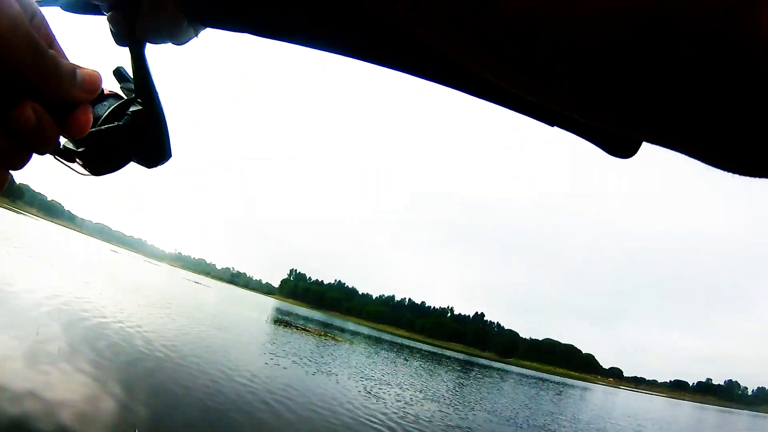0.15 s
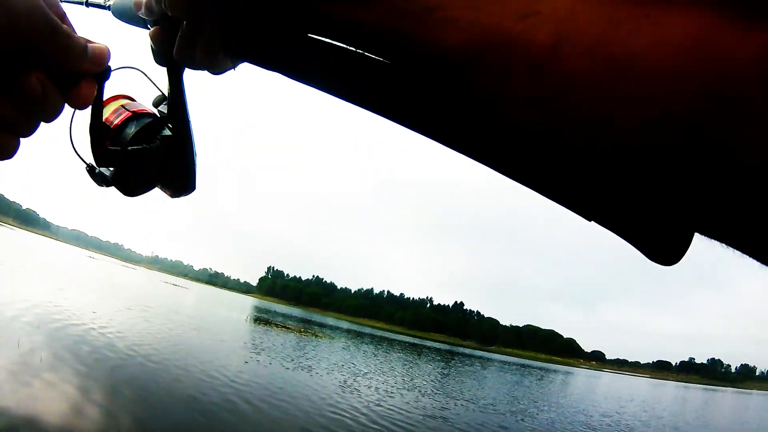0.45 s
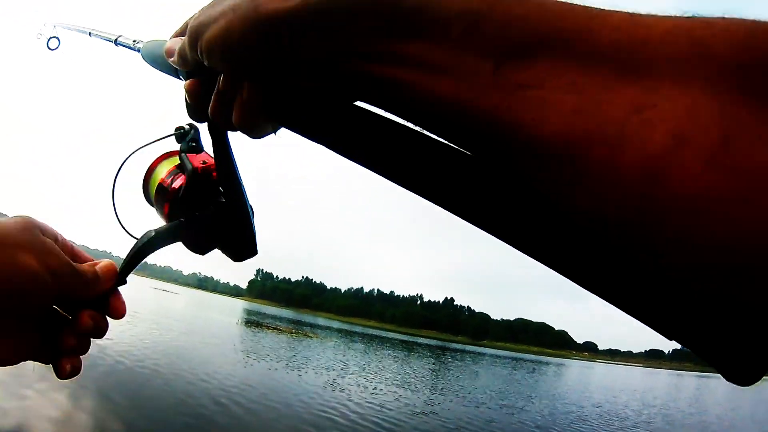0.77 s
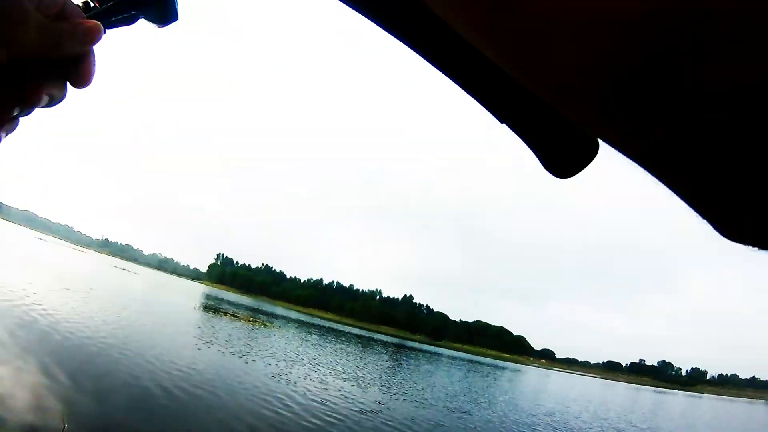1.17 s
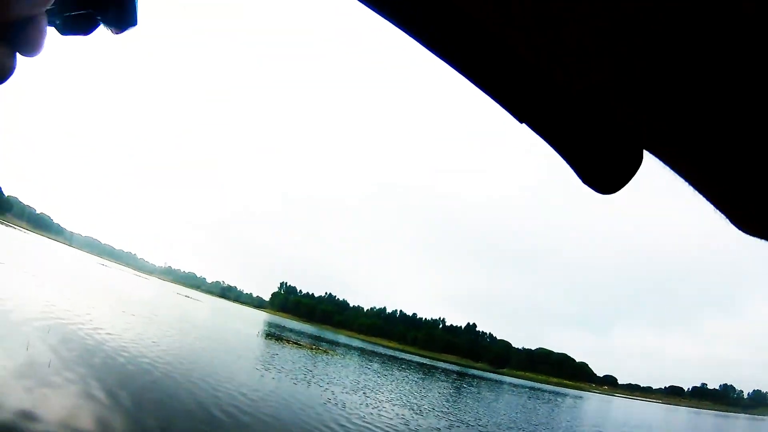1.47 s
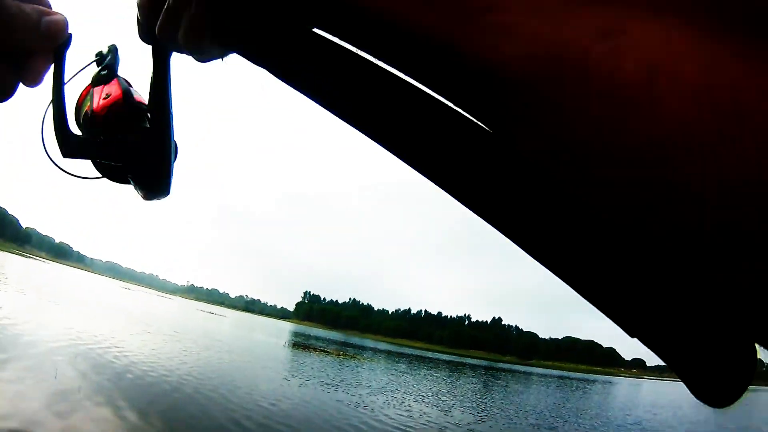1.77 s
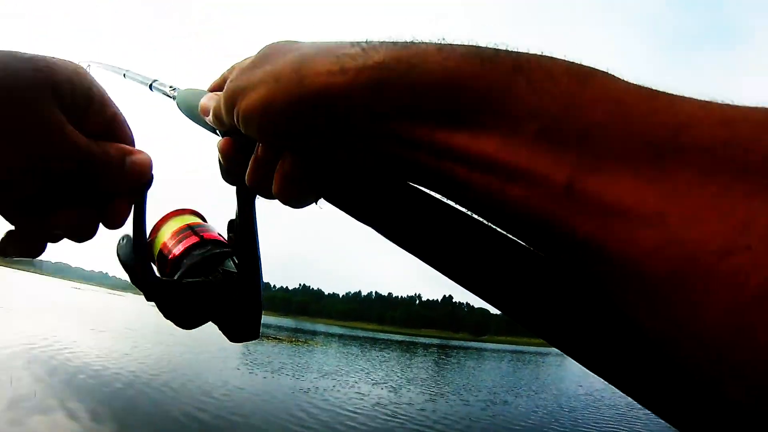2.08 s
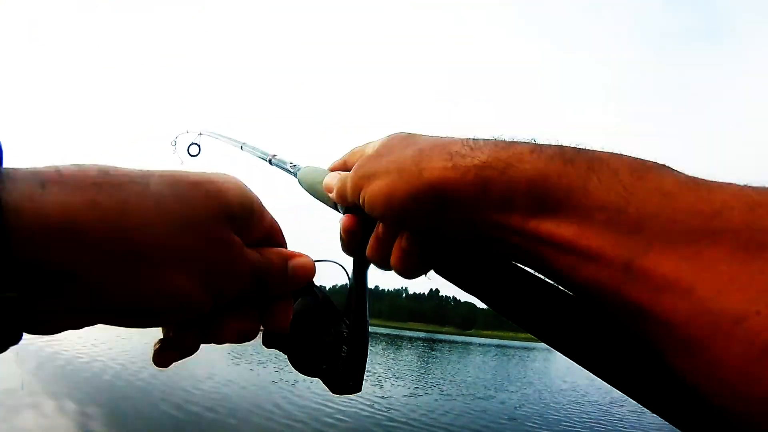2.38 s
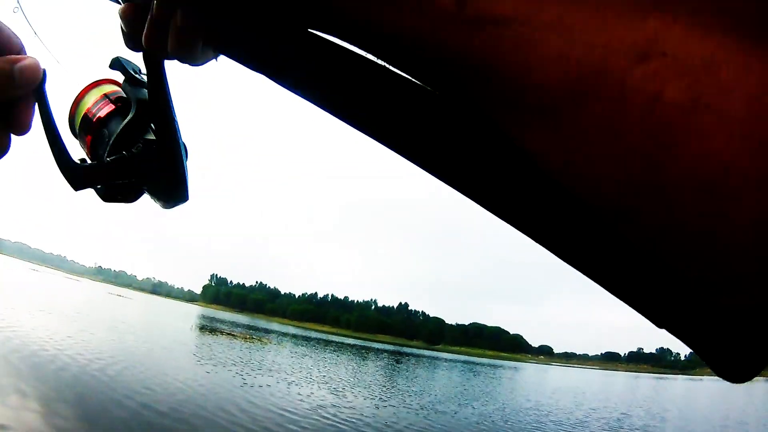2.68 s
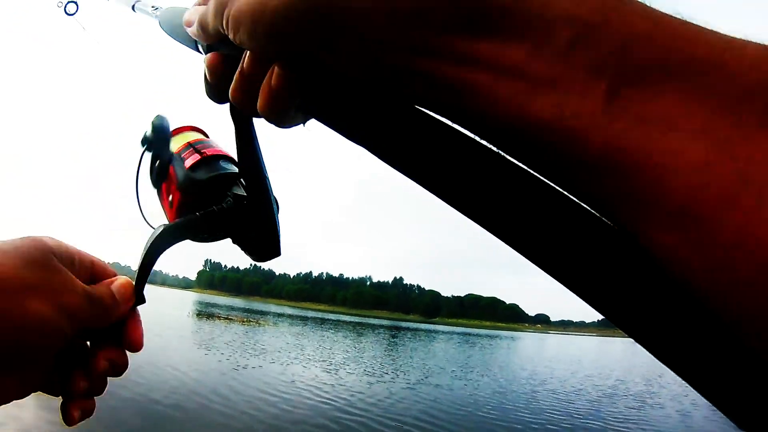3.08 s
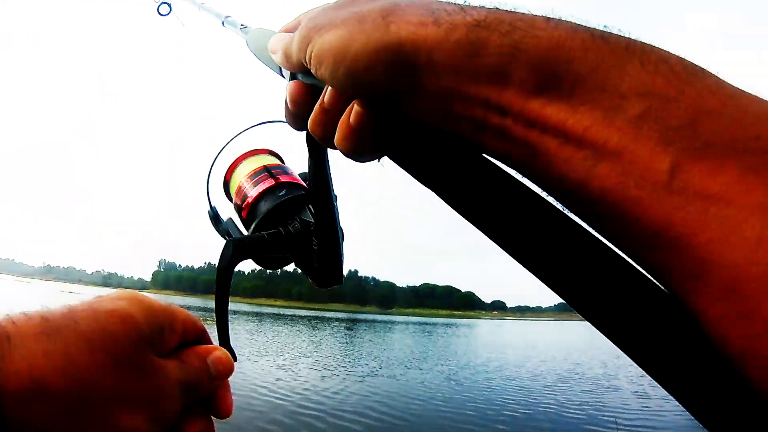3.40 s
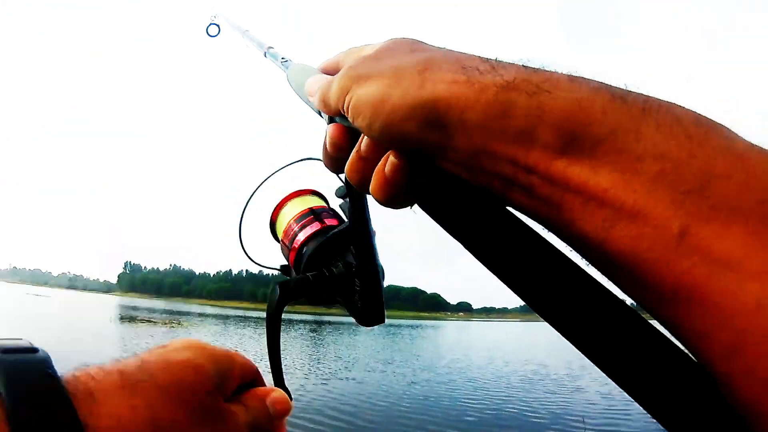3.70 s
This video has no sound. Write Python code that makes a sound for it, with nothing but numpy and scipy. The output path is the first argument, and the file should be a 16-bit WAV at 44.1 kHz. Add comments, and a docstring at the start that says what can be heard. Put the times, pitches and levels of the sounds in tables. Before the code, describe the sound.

A fishing reel is cranked outdoors, heard close and muffled through a camera case. From 0 to 0.9 s, soft rustling rubs and tiny ringing taps; at 1.13 and 1.19 s, sharper clacks with scraping. Quieter rubs and a rising line squeak follow around 1.6-1.8 s, then faint chirps. Rubbing returns at 2.5-3.1 s with brief squeaks. At 3.58 s one loud knock, quickly damped, over hiss and freshening wind rumble.

```python
"""A spinning reel is cranked on a lake, heard through the closed case of a camera worn on the body.
From the start reel and case give short ringing taps, strap and cloth rub and tick on the case, which
rings dully as dying sines, and light wind rumbles over microphone hiss, both made of shaped noise. Then
the line squeaks as it tightens and slackens: wobbling sines that glide or, once, hold as a rasp, and
short chirps. Near the end the wind freshens, and one hard knock rings out and is soon damped."""
import sys
import numpy as np
from scipy import signal
from scipy.fft import rfft
from scipy.io import wavfile
from scipy.ndimage import uniform_filter1d

SR = 44100
rng = np.random.default_rng(int(sys.argv[2]) if len(sys.argv) > 2 else 0)


def volts(x):
    """Linear amplitude factor 10**(x/20) for a level x in dB, scalar or array-like."""
    e = np.asarray(x, float) / 20
    return 10 ** e


def pcm_store(signal):
    """Save signal as 16-bit PCM."""
    levels = np.round(np.clip(np.atleast_2d(signal), -1, 1) * 32767)
    wavfile.write(sys.argv[1], SR, levels.astype(np.int16).T)


N = 169785  # length of the scene in samples


def evened(x):
    """Scales to rms 1."""
    return x / np.sqrt(np.mean(x ** 2) + 1e-20)


def drift(seconds):
    """Slow random wandering of rms 1: noise smoothed twice over the given time."""
    width = max(int(seconds * SR), 2)
    smooth = uniform_filter1d(rng.standard_normal(N), width)
    return evened(uniform_filter1d(smooth, width))


def ring(modes, rise_s=0.00026):
    """What one push sets ringing: dying sines with a soft start, scaled together to peak 1."""
    t = np.arange(4096) / SR
    y = sum(volts(level_db - 60 * t / t60) * np.sin(2 * np.pi * hz * t) for hz, level_db, t60 in modes)
    y = y * (1 - np.exp(-t / rise_s)) ** 2
    return y / abs(y).max()


def add(mix, start_s, sound):
    """Mixes a sound in at its start time."""
    part = mix[round(start_s * SR):][:len(sound)]
    part += sound[:len(part)]


# Faint rubbing that underlies the strokes: (time [s], low ring level [dB])
FAINT_RUB = [(0, -63.5), (.9, -63.5), (1.05, -65.5), (1.55, -69.5), (1.95, -58.5), (2.45, -61),
             (3.15, -62.5), (3.35, -60.5), (3.6, -56.5), (3.85, -57.5)]
# Strokes of strap and cloth over the case: (start [s], length [s], low ring level [dB],
# middle ring relative to low [dB], upper ring relative to low [dB])
STROKES = [(.01, 0.063, -52, -3.5, -20), (0.116, 0.079, -50, -19, -35), (0.259, 0.062, -48, -10, -29),
           (0.337, .15, -50, -6, -19.5), (0.513, 0.14, -54.5, -6, -21), (0.673, 0.07, -54.5, -3, -21),
           (0.79, 0.098, -54, -6, -18), (1.136, 0.049, -49, 6, -12), (1.189, 0.037, -42, -9, -15),
           (1.24, 0.078, -43, -9, -18.5), (1.629, 0.099, -51.5, -2.5, -20), (1.689, 0.09, -51, -5.5, -17),
           (1.794, 0.084, -58.5, 2, -11.5), (2.514, 0.087, -51.5, 3.5, -18),
           (2.627, 0.04, -41, -6.5, -20.5), (2.679, 0.086, -49, -6.5, -27),
           (2.804, 0.046, -46.5, -4.5, -25), (2.892, 0.022, -53, -4.5, -23), (2.943, 0.083, -51, -6.5, -23),
           (3.07, 0.035, -54.5, -2, -8.5)]


def rub_levels():
    """Adds the power of faint rubbing and strokes; returns low, middle and upper ring levels."""
    t = np.arange(N) / SR
    rise_s, fall_s = 0.0055, 0.0063  # straight rise, exponential fall
    faint_relative_db = np.array([[0], [-3], [-12]])  # low, middle, upper
    power = volts(np.interp(t, *np.transpose(FAINT_RUB)) + faint_relative_db) ** 2
    for start, length, low_db, middle_db, upper_db in STROKES:
        rise = np.clip((t - start) / rise_s, 0, 1)
        fall = np.exp(-np.maximum(t - start - length, 0) / fall_s)
        peak = volts(low_db + np.array([[0], [middle_db], [upper_db]]))
        power += (rise * fall * peak) ** 2
    return np.sqrt(power)


# Ways the case can ring, in four groups:
# (frequency [Hz], level within the group [dB], time to die by 60 dB [s])
LOW = [(399.2, -8, 0.1), (441.3, 0.5, 0.076), (472, -6.5, 0.071)]
MIDDLE = [(613, -1.5, 0.039), (690.5, -1, 0.053), (743.6, -2, 0.074), (826, -9, 0.033), (1114, -15, 0.047)]
UPPER = [(1303, 14, 0.0098), (1430, 4, 0.019), (1956, 9, 0.02), (2377, 5.5, 0.017), (2890, -12, 0.025)]
TOP = [(3530, -3.5, 0.011), (4405, 1.5, 0.014), (5370, -10.5, 0.021), (5816, -10, 0.02), (6750, -24, 0.018)]


def rubbing():
    """Uneven little slips and a smooth scrape drive the four ring groups of the case."""
    slips_per_s, slip_spread_db = 1200, 3.5
    smooth_share = 0.37  # share of the driving power
    top_under_upper_db = -17.5
    low, middle, upper = rub_levels()
    size = volts(slip_spread_db * np.minimum(rng.exponential(1, N), 4))
    direction = rng.choice([-1., 1.], N)
    happens = rng.random(N) < slips_per_s / SR
    slips = evened(size * direction * happens)
    top = upper * volts(top_under_upper_db)
    out = np.zeros(N)
    for modes, level in ((LOW, low), (MIDDLE, middle), (UPPER, upper), (TOP, top)):
        scrape = rng.standard_normal(N)
        drive = np.sqrt(1 - smooth_share) * slips + np.sqrt(smooth_share) * scrape
        answer = ring(modes)
        answer = answer / np.linalg.norm(answer)  # the drive level becomes the ring level
        out += signal.oaconvolve(drive * level, answer)[:N]
    return out


# Ticks on the case: (time [s], drive level before the group's push [dB],
# low and middle drive relative to it [dB], top drive relative to it [dB])
TICKS = [(0.2587, -52.5, 10.5, -26), (0.2834, -53, 9, -26), (0.3381, -51.5, 15, -21),
         (1.1242, -50, -2, -25), (1.133, -39, -6, -25), (1.179, -49, 3, -18), (1.1908, -42, 2, -8),
         (1.2059, -48, 0, -6), (1.5745, -55, 6, -17), (1.604, -51, 10, -30), (1.6316, -56, 9, -12),
         (1.6676, -52, 9, -20), (1.6871, -54, 10, -15), (2.6264, -43, 6, -9), (2.735, -51, 9, -24),
         (2.8028, -50, 8, -24), (2.8434, -53, 10, -24), (2.9402, -52.5, -2, -5.5), (3.6085, -46.5, -8, -10),
         (3.7004, -49, 4, -19)]


def ticks():
    """Each tick is a short uneven contact that rings all groups of the case."""
    time_s, level_db, low_db, top_db = np.transpose(TICKS)
    steps = np.arange(40)  # samples of one contact
    contact = rng.standard_normal((len(time_s), len(steps))) * np.exp(-steps / 8.)
    contact[:, 0] = 2  # a firm first touch
    contact = abs(contact) / abs(contact).sum(1, keepdims=True)
    at = np.round(time_s[:, None] * SR).astype(int) + steps
    out = np.zeros(N)
    for modes, relative_db, push in ((LOW + MIDDLE, low_db, 1), (UPPER, 0, 2), (TOP, top_db, 4)):
        drive = np.zeros(N)
        drive[at] = push * contact * volts(level_db + relative_db)[:, None]
        out += signal.oaconvolve(drive, ring(modes))[:N]
    return out


# Short ringing taps of reel and case: (time [s], peak level [dB], frequency of the main mode [Hz])
TAPS = [(.013, -57, 1850), (.034, -59, 1800), (0.072, -54.5, 1800), (0.1203, -53, 1840),
        (0.1592, -57, 1960), (0.2583, -55, 1890), (0.2846, -53, 1870), (.3047, -58, 1910),
        (1.1332, -34, 800), (1.1918, -28, 420), (1.197, -38, 1474), (1.3653, -54.5, 1430),
        (1.3955, -54, 1440), (1.4638, -51.5, 1390), (2.0158, -50, 1540), (2.0303, -47, 1550),
        (3.0807, -51, 1520), (3.0947, -45.5, 1553)]


def case_and_reel_taps():
    """Each tap is a soft pair of dying modes, the second higher and weaker."""
    t60_s, rise_s = 0.025, 0.001
    out = np.zeros(N)
    for time_s, peak_db, hz in TAPS:
        pair = [(hz, 0, t60_s), (1.3 * hz, -9, t60_s)]
        add(out, time_s, volts(peak_db) * ring(pair, rise_s))
    return out


# Modes of the hard knock:
# (frequency [Hz], relative level [dB], time to die by 60 dB before the extra damping [s])
KNOCK_MODES = [(527, -12, 0.039), (722.6, -0.5, 0.05), (880, -23.5, 0.032), (1353, -8.5, 0.016),
               (1680, -20, 0.024), (2080, -24, 0.025), (2267, -9, 0.014), (3150, -25, .012),
               (4440, -28, 0.0095), (5600, -51.5, 0.0083)]


def knock():
    """One hard blow rings freely, then most of it is damped while a weaker part rings on."""
    time_s, level_db, rise_s = 3.5761, -8, 0.00053
    free_s, damped_t60_s, rings_on_db = .0072, .018, -15
    blow = ring(KNOCK_MODES, rise_s)
    late = np.maximum(np.arange(len(blow)) / SR - free_s, 0)
    damping = np.maximum(volts(-60 * late / damped_t60_s), volts(rings_on_db))
    out = np.zeros(N)
    add(out, time_s, volts(level_db) * damping * blow)
    return out


def line_wobble():
    """The roughness of the line: fast pitch wobble [Hz] and a level flicker as a factor."""
    wobble_hz, flicker_db = 220, 4  # both rms
    return wobble_hz * drift(.0008), volts(flicker_db * drift(.003))


# Glides of the squeaking line, and one held rasp; in the glides pitch rises as the line tightens.
# Each squeak is a list of
# (time [s], frequency before wobble [Hz], level before flicker and the case [dB])
SQUEAKS = [
    [(1.708, 1850, -56), (1.726, 2090, -55.5), (1.738, 3100, -64), (1.748, 4250, -62), (1.766, 4450, -59),
     (1.778, 5550, -63), (1.806, 5900, -64), (1.838, 6850, -77)],
    [(2.455, 7000, -83), (2.482, 5600, -76), (2.495, 4300, -65), (2.504, 2950, -57), (2.522, 1910, -62)],
    [(2.535, 2550, -69), (2.62, 2540, -68)],
    [(2.95, 1350, -59), (2.968, 2890, -57), (2.98, 3800, -66), (2.995, 4600, -60), (2.999, 5800, -75),
     (3.012, 6050, -74)],
]


def squeaks():
    """Rough gliding whistles and a held rasp, with an overtone, heard mostly at rings of the case."""
    overtone_db, off_ring_db = -13, -6
    t, line = np.arange(N) / SR, np.zeros(N)
    wobble, flicker = line_wobble()
    for squeak in SQUEAKS:
        time_s, hz, level_db = np.transpose(squeak)
        phase = 2 * np.pi * np.cumsum(np.interp(t, time_s, hz) + wobble) / SR
        tone = np.sin(phase) + volts(overtone_db) * np.sin(2 * phase)
        sounding = (t > time_s[0]) & (t < time_s[-1])
        line += volts(np.interp(t, time_s, level_db)) * sounding * tone
    line = line * flicker
    rings = [ring([mode]) for mode in UPPER + TOP]  # all of equal peak
    strongest = max(abs(rfft(r)).max() for r in rings)
    answer = 2 * sum(rings) / strongest  # longer rings answer louder
    return volts(off_ring_db) * line + signal.oaconvolve(line, answer)[:N]


# Short chirps of the taut line:
# (time of the middle [s], frequency before wobble [Hz], level before flicker [dB])
CHIRPS = [(1.716, 4370, -70), (1.92, 6600, -78.5), (1.97, 6230, -70.5), (1.98, 6800, -72.5),
          (2.26, 7040, -68), (2.287, 7240, -75), (2.325, 7100, -79)]


def chirps():
    """Each chirp is a brief bell-shaped swell of a wobbling sine."""
    swell_s = 0.0066  # standard deviation of the bell
    t, out = np.arange(N) / SR, np.zeros(N)
    wobble, flicker = line_wobble()
    for time_s, hz, level_db in CHIRPS:
        swell = np.exp(-.5 * ((t - time_s) / swell_s) ** 2)
        phase = 2 * np.pi * np.cumsum(hz + .5 * wobble) / SR
        out += volts(level_db) * swell * flicker * np.sin(phase)
    return out


def wind_gusts():
    """Level of the bass wind over time [dB]: lumpy gusts, and a freshening near the end."""
    gust_db, freshen_db = 1, 6
    freshen_start_s, freshen_length_s = 3.43, 0.2
    t = np.arange(N) / SR
    freshening = np.clip((t - freshen_start_s) / freshen_length_s, 0, 1)
    return gust_db * drift(0.1) + freshen_db * freshening


# Colour of hiss and air before gusts: (frequency [Hz], relative level per Hz [dB])
FLOOR_COLOUR = [(12, -39), (20, 6.5), (79, 1.5), (267, -8.5), (438, -9.5), (577, -9), (760, -13),
                (1180, -20.5), (2050, -23), (7910, -38.5), (13300, -38), (14500, -51.5)]


def floor():
    """Microphone hiss and steady air as noise shaped by frequency; the bass comes in lumpy gusts."""
    level_db, gust_top_hz = -58, 180  # gusts have half their dB at the top
    frames, hop = N // 256 + 5, 256
    hz = np.fft.rfftfreq(1024, 1 / SR)
    real, imaginary = rng.standard_normal((2, frames, 513))
    colour_hz, colour_db = np.transpose(FLOOR_COLOUR)
    colour = np.interp(np.log(hz + 1), np.log(colour_hz + 1), colour_db)
    gust = np.interp(np.arange(frames) * hop, np.arange(N), wind_gusts())
    gust = gust[:, None] / (1 + (hz / gust_top_hz) ** 2)
    spectrum = (real + 1j * imaginary) * volts(colour + gust)
    noise = signal.istft(spectrum.T, nperseg=1024, noverlap=768)[1][:N]
    return volts(level_db) * evened(noise)


def scene():
    """All sources, mono."""
    reel_and_case = rubbing() + ticks() + case_and_reel_taps() + knock()
    line = squeaks() + chirps()
    return (reel_and_case + line + floor())[None]


def roll_off(x):
    """The treble ends steeply here."""
    return signal.sosfilt(signal.butter(12, 14960, fs=SR, output="sos"), x)


def record(dry):
    """Cuts the treble above 14 kHz and finishes the mix."""
    low_pass = signal.firwin(511, 14000, window=("kaiser", 9), fs=SR)
    mix = signal.oaconvolve(dry, low_pass[None], "same")
    return roll_off(mix)


dry = scene()
out = record(dry)
pcm_store(out)
```